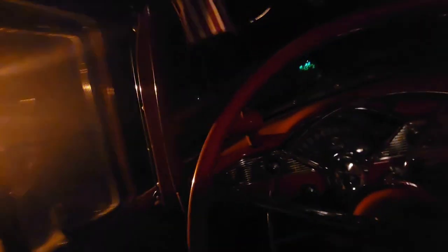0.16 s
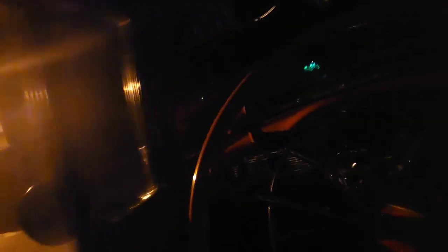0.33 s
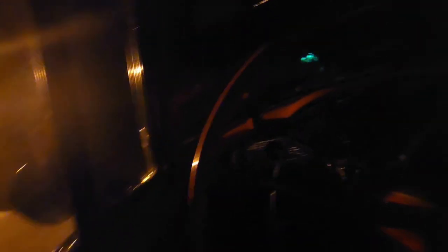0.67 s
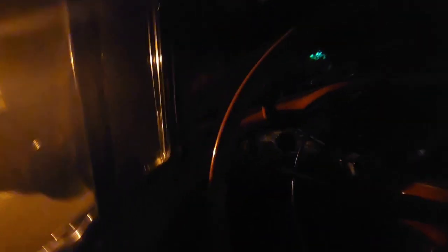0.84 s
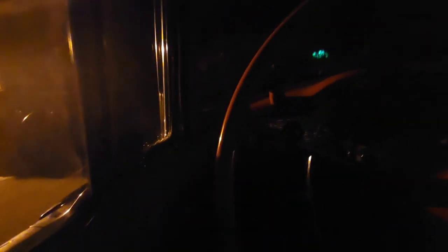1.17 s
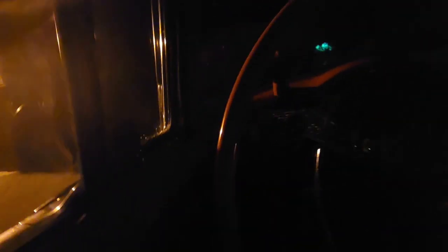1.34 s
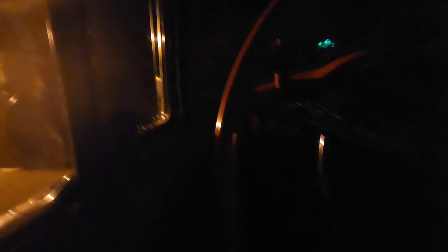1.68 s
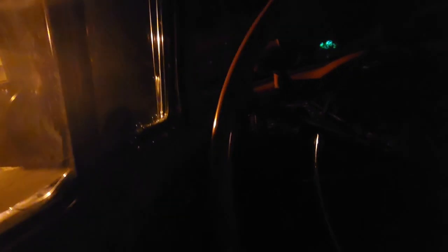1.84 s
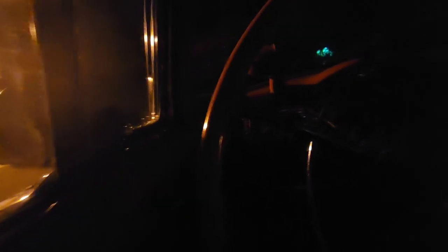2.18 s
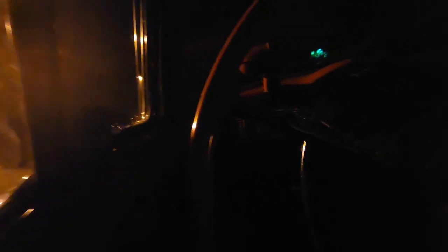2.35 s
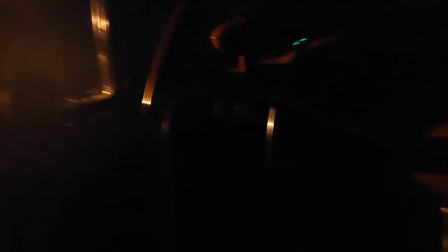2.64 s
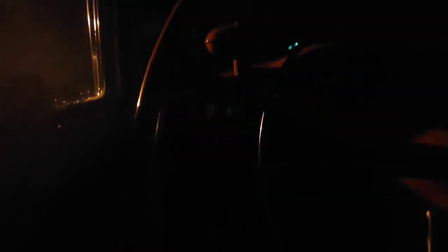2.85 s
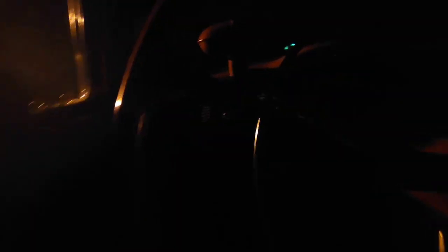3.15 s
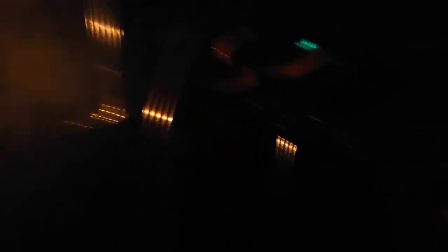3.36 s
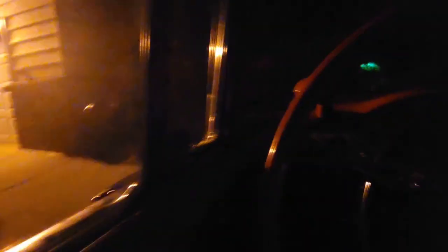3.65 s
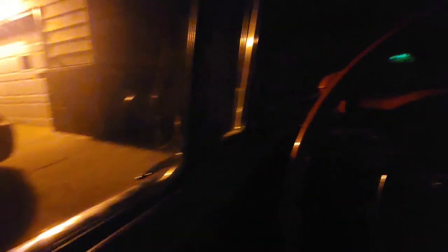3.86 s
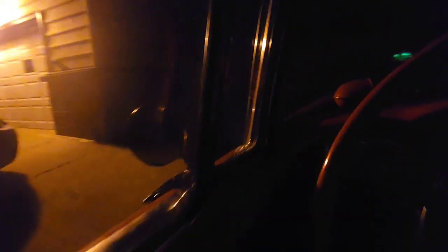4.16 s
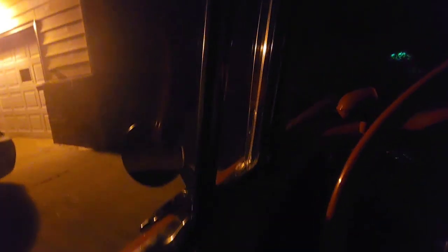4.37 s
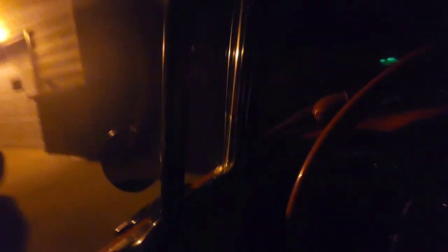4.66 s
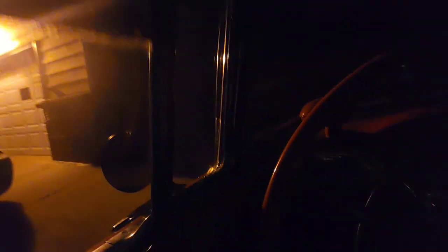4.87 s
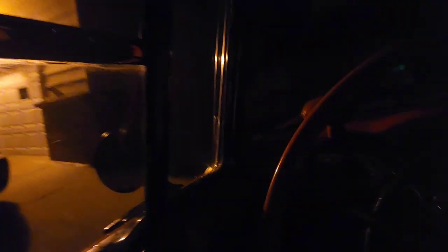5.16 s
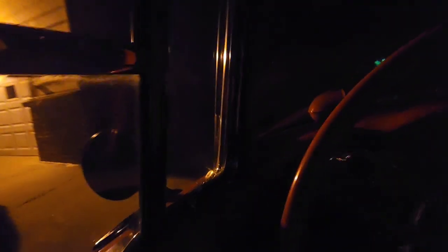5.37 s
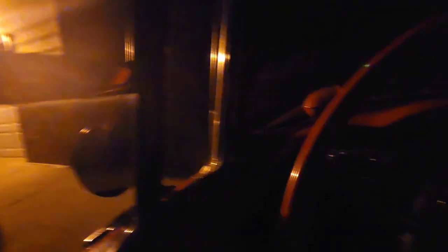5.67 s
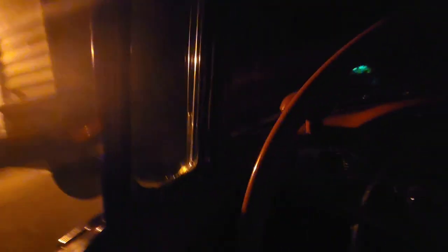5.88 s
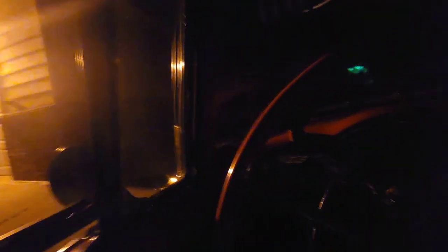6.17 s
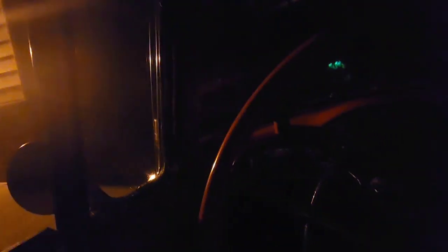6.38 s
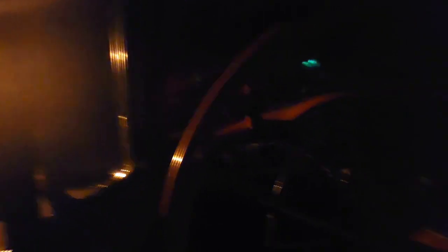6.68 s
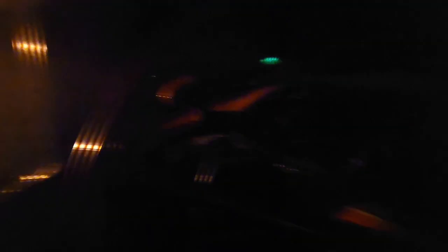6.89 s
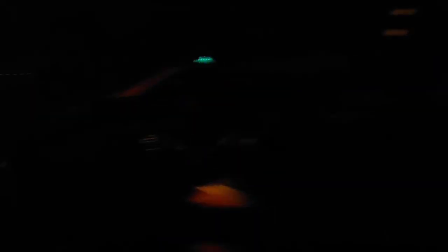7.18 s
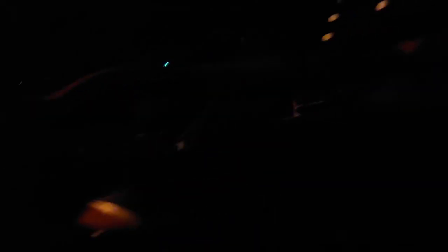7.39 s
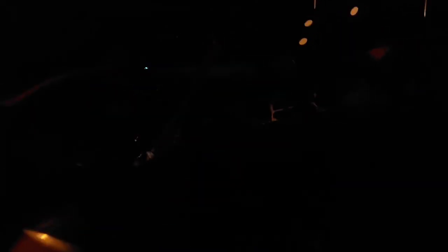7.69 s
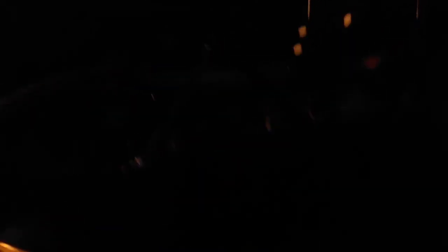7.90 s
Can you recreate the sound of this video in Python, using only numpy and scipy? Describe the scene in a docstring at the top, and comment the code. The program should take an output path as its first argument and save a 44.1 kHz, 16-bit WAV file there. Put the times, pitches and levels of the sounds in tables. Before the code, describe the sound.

Heard from the driver's seat of an old car, a heavy steel door on the left catches its latch and slams at about 0.4 seconds. It is by far the loudest sound, with a metallic clank, a quick rattle and a deep boom that dies away within a second or so. Faint clothing rustle and soft bumps follow as the driver settles, with a firmer thud at 3.3 seconds. At 3.7 a window crank gives a short creak, and the side window winds down until about 6.7, with a swishing sleeve, dull knocks and dragging glass that squeals most around 5.8. At 7.2 a deep handling bump jolts the microphone, with more rustling. Dry finger ticks come now and then, including one at 8 seconds. A faint low rumble and a barely audible thin whine fill the cabin throughout.

```python
"""Inside an old car at night a heavy steel door is pulled shut: the latch catches, then the door slams,
booms and rattles as it rocks on its seal. The driver settles with rustling clothes and bumps the trim.
Next the window crank creaks and the side window winds down: a sleeve swishes, the glass drags and sings
in its channel. Near the end the hand-held camera is jolted. Fingers tick on its case now and then,
and a faint rumble and a thin whine fill the cabin throughout."""
import sys
import numpy as np
from scipy.fft import rfft, irfft, next_fast_len
from scipy.io import wavfile
from scipy.ndimage import map_coordinates

SR = 44100
rng = np.random.default_rng(int(sys.argv[2]) if len(sys.argv) > 2 else 0)


def inscribe(sig):
    """Save sig as 16-bit PCM at rate SR to the path in sys.argv[1].

    A 1-D sig is mono; a 2-D sig holds one channel per row.
    Samples are clipped to [-1, 1] before scaling.
    """
    pcm = np.round(np.clip(np.atleast_2d(sig).T, -1, 1) * 32767)
    wavfile.write(sys.argv[1], SR, pcm.astype(np.int16))


N = 354563

# The bright hiss of a crash or scuff. Each row: frequency in Hz, relative level in dB.
CRASH_SPECTRUM = [(1500, -24.5), (2800, 1), (4500, 1.5), (7500, 1.5), (10000, -7), (12500, 0.5),
                  (15800, -3)]
# How alike left and right sound. Each row: frequency in Hz, likeness (1 means the same).
STEREO_LIKENESS = [(100, 1), (280, 0.97), (550, 0.66), (1100, 0.28), (2000, 0.096), (4000, 0),
                   (12000, 0.13)]
# How much louder the left side is. Each row: frequency in Hz, left minus right in dB.
LEFT_BIAS = [(60, 0.86), (150, 1), (350, 3), (700, 5), (1200, 2.5), (2200, -2), (4000, 3.5), (8000, 5),
             (13000, 7.5)]

REBOUND_S, SWING_S = 0.495, 0.052  # when the shut door starts to rock, and how long a swing takes


def door_clanks():
    """The latch rides over its striker, the door lands, then it rattles once a swing, ever more weakly."""
    # Steel hits steel. Each row: start in seconds, clank, crash and latch levels in dB, fade in seconds.
    contacts = [(.306, -46.5, -60.5, -75, 0.12), (0.349, -41.5, -49, -65, 0.098),
                (.379, -24, -40, -66, .17), (.408, -40, -41, -56, 0.055), (0.416, -32.5, -28.5, -52, 0.077),
                (.432, -10.5, -16, -35.5, 0.17), (.451, -18, -16, -18, 0.15), (.464, -18, -24, -27.5, .19)]
    # The tone of a clank. Each row: frequency in Hz, relative level in dB.
    clank_spectrum = [(100, -22.5), (300, -6.5), (550, 2.5), (900, 0.5), (1600, -3), (2150, -0.5),
                      (2600, -11.5), (3600, -21.5), (8000, -57.5)]
    # Notes of the door shell and small latch parts. Each row: pitch in Hz, level in dB, fade in seconds.
    shell_modes = [(466, -4, .3), (494, -5, .3), (599, -8, .27), (850, -5, .25), (924, -7, .22),
                   (1384, -9, .22), (1918, -8, .2), (2080, 2, .22), (2240, -3, .2), (2423, -3, .18),
                   (3310, -12, .2), (4291, -6, .18)]
    latch_modes = [(7510, -17, .13), (12435, -6, .08), (12700, -9, .09), (13438, -9, .07)]
    rattles = [(REBOUND_S + k * SWING_S, -24.5 - 6 * k, -31.5 - 5 * k, -30.5 - 2 * k, 0.12)
               for k in range(4)]
    out, size = np.zeros((2, N)), SR // 2
    for start, clank_db, crash_db, latch_db, t60 in contacts + rattles:
        clank = amp(clank_db - 1) * noise(clank_spectrum, grain_db=2, size=size) * pan(2.2)
        crash = amp(crash_db + 1) * noise(CRASH_SPECTRUM, grain_db=3, size=size) * pan(1)
        shell_db = 1.3 * clank_db - 8.5  # the shell rings mostly under hard blows
        shell = amp(shell_db) * ring(shell_modes, attack=0.001, scatter_db=-0.5, size=size) * pan(1)
        latch = amp(latch_db) * ring(latch_modes, attack=0.001, scatter_db=2, size=size)
        add(out, start, (clank + crash) * fall(t60, attack=0.0002, size=size) + shell + latch)
    return out


def door_boom():
    """The slam sets the door panel and the cabin air booming."""
    # Notes of the panel and the air. Each row: pitch in Hz, level in dB, fade in seconds.
    boom_modes = [(37.32, -32, 1.6), (52.1, -25, 1.2), (78.2, -24, 1.1), (99.03, -26, 0.81),
                  (123.7, -21, 1.4), (167.5, -16.5, .55), (224.4, -27, 0.47), (268.3, -21.5, .42),
                  (302, -26, 0.26)]
    # The deep noise of the slam. Each row: frequency in Hz, relative level in dB.
    body_spectrum = [(15, -9), (35, -6), (110, 1), (180, -5), (300, -11.5), (400, -18), (650, -29.5),
                     (1200, -48), (3000, -78)]
    out, size = np.zeros((2, N)), 2 * SR
    # the closing door squeezes the air just before the seal lands
    add(out, 0.38, amp(-22.5) * noise(body_spectrum, size=SR) * fall(0.89, attack=0.02))
    add(out, 0.434, amp(1) * ring(boom_modes, attack=0.012, scatter_db=1.5, size=size))
    # the soft seal passes on only the deepest notes when the door rebounds
    deep_modes = [(hz, db, t60) for hz, db, t60 in boom_modes if hz < 200]
    for k in range(2):
        sway = ring(deep_modes, attack=0.012, scatter_db=5, size=size)
        add(out, REBOUND_S + k * SWING_S, amp(-10 - 2 * k) * sway)
    # the whole car body goes on shuddering around the notes of the boom
    shudder = noise(body_spectrum, peaks=[(hz, 14, 7) for hz, _, _ in boom_modes], size=size)
    add(out, 0.432, amp(-10.5) * shudder * fall(0.8, attack=0.012, size=size))
    return out


def window():
    """A sleeve swishes as the crank turns; the glass drags, shakes the door and sings under pressure."""
    # The winding. Each row: time in seconds, glass drag level in dB, sleeve swish level in dB.
    winding = [(3.4, -80, -77.5), (3.62, -61, -60), (3.85, -66, -59), (4.28, -64, -53), (4.43, -59.5, -50),
               (4.68, -65, -56), (4.95, -47, -51.5), (5.2, -52, -56.5), (5.66, -44, -64), (6.0, -48, -54),
               (6.15, -54.5, -56.5), (6.28, -54.5, -58.5), (6.38, -62, -67), (6.7, -68.5, -77)]
    # The tones of door, glass and sleeve. Each row: frequency in Hz, relative level in dB.
    shudder_spectrum = [(30, -18), (60, -15.5), (100, 6), (170, 4), (230, -7), (320, -11), (450, -23),
                        (900, -56)]
    drag_spectrum = [(200, -59), (350, 3.5), (700, -2), (900, -8.5), (1400, -6.5), (2000, -7.5),
                     (3200, -7.5), (5000, -16.5), (8000, -21.5), (12000, -23.5)]
    swish_spectrum = [(500, -21), (1000, 5), (2200, 5), (4200, 5.5), (6000, 2.5), (7600, 1), (9500, -4),
                      (12500, 5), (15800, 2)]
    # Narrow resonances of glass and sleeve. Each row: pitch in Hz, width in Hz, boost in dB.
    glass_peaks = [(599, 82, 14.5), (762, 93, 9), (1106, 40, 12), (1395, 22, 11.5), (2290, 65, 11.5),
                   (2580, 41, 13), (3450, 66, 10.5), (4130, 43, 1), (5280, 33, 12), (6320, 66, -7),
                   (7310, 130, 11.5)]
    swish_peaks = [(1866, 46, 7.5), (2180, 130, 10), (2350, 62, 6), (3290, 51, 12), (4190, 81, 8),
                   (5330, 60, 10), (6360, 190, 7), (7520, 125, 12)]
    push_s, push_width_s = 5.84, 0.048  # one hard push on the crank
    usual_drag_db, usual_swish_db = -53.5, -59.5
    push_db = 11 * np.exp(-((np.arange(N) / SR - push_s) / push_width_s) ** 2)
    drag_db, swish_db = curves(winding) + push_db
    grip_db = 1.26 * wobble(rate=24)  # the glass catches and lets go
    effort_db = 0.35 * (drag_db - usual_drag_db) + 0.53 * (swish_db - usual_swish_db)
    shudder = amp(-42.5 + effort_db + grip_db) * noise(shudder_spectrum)
    pressure = np.clip((drag_db + 60) / 12, 0, 1)
    plain = np.sqrt(1 - pressure) * noise(drag_spectrum, grain_db=1, grain_rate=200)
    singing = np.sqrt(pressure) * noise(drag_spectrum, grain_db=2, grain_rate=460, peaks=glass_peaks)
    drag = amp(drag_db + 3 + grip_db) * (plain + singing)
    sleeve = noise(swish_spectrum, grain_db=0.4, peaks=swish_peaks) * pan(-0.5)
    swish = amp(swish_db + 3.5 + 2.1 * grip_db) * sleeve
    return (shudder + drag + swish + np.sqrt(pressure) * glass_squeal(drag_db)) * during(winding)


def glass_squeal(drag_db):
    """One resonance of the glass sings out unsteadily, the louder the harder it drags."""
    band = noise([(1900, -41), (2150, -25), (2240, 14), (2330, -24), (2700, -40)])
    flutter_db = 4 * wobble(rate=51)
    return amp(drag_db - 6.5 + flutter_db) * band


def crank_creak():
    """The dry spindle chirps as the crank is taken in hand."""
    # Notes of the spindle. Each row: pitch in Hz, level in dB, fade in seconds.
    spindle_modes = [(1040, 0, 0.076), (1300, 0.5, 0.086)]
    out = np.zeros((2, N))
    add(out, 3.666, amp(-30) * ring(spindle_modes, attack=0.003, scatter_db=1))
    return out


def knocks():
    """Padded blows on seat and trim: the cabin air thuds under a scuff and a dull clack."""
    # Each row: start in seconds, thud level in dB and pitch in Hz, clack level in dB and pitch in Hz,
    # fade of the clack in seconds.
    bumps = [(.204, -36, 123, -42.5, 476, .14), (1.272, -44, 122, -57.5, 511, 0.13),
             (2.721, -40.5, 110, -55.5, 321, .25), (2.799, -35.5, 95, -79, 259, .1),
             (2.908, -35.5, 134.6, -45, 440, 0.18), (3.311, -30, 129, -36.5, 444, 0.19),
             (3.325, -19, 117, -31, 330, 0.07), (3.379, -35, 105, -44.5, 327, 0.13),
             (3.521, -39.5, 130, -47.5, 510, 0.42), (3.635, -28.5, 78, -41, 1830, 0.29),
             (3.663, -24.5, 179, -27.5, 1250, 0.059), (4.392, -33.5, 140, -48, 412, .18),
             (4.774, -25.5, 201, -50, 326, .2), (4.923, -28.5, 190, -43, 302, 0.6),
             (5.108, -36, 152, -44, 2060, 0.27), (5.154, -45, 150, -42, 1990, 0.64),
             (5.822, -24.5, 160, -28, 2200, 0.07), (5.904, -28.5, 128, -39.5, 346, 0.4),
             (6.192, -32.5, 158, -41.5, 1260, 0.2), (6.407, -30, 100, -49, 324, 0.37),
             (6.51, -29, 109, -35, 600, 0.14), (7.207, -52, 110, -51.5, 400, 0.19),
             (7.245, -40.5, 170, -51, 426, 0.27), (7.851, -64, 100, -48.5, 411, .1),
             (7.939, -52, 79, -48.5, 1920, 0.063), (8.008, -53, 110, -37.5, 2010, 0.069)]
    # Notes of the cabin air. Each row: pitch in Hz, level in dB, fade in seconds.
    cabin_modes = [(75, -2.5, 0.4), (104.6, -0.5, 0.25), (130, -1.5, 0.16), (183.2, -2, .16),
                   (275.3, -10.5, 0.29), (310, -10, 0.18)]
    # The tone of a clack. Each row: frequency in Hz, relative level in dB.
    clack_spectrum = [(120, -22), (300, 6.5), (480, -1), (750, 1), (1250, -3), (1700, -7), (2400, -7.5),
                      (3300, -26.5), (8000, -59)]
    out, size = np.zeros((2, N)), SR // 2
    for start, thud_db, thud_hz, clack_db, clack_hz, t60 in bumps + settling_bumps():
        clack = noise(clack_spectrum, grain_db=-1, peaks=[(clack_hz, clack_hz * 0.13, 13)], size=size)
        scuff = amp(-19.5) * noise(CRASH_SPECTRUM, grain_db=2, size=size)
        add(out, start, amp(clack_db) * (clack + scuff) * fall(t60, attack=0.000082, size=size))
        # a blow mostly wakes the notes near its own pitch
        woken = [(hz, db - 11 * abs(np.log2(hz / thud_hz)), fade) for hz, db, fade in cabin_modes]
        add(out, start, amp(thud_db + 3) * ring(woken, attack=0.0098, scatter_db=5, size=size))
    return out


def settling_bumps(count=6, first_s=1.05, gap_s=0.3, thud_hz=154.6, clack_hz=340, t60=0.16):
    """The driver settles in the seat: rows for knocks(), loosely spaced and ever fainter."""
    k = np.arange(count)
    starts = first_s + k * gap_s + 0.082 * rng.standard_normal(count)
    levels_db = -42 - 4.2 * k
    return [(start, db, thud_hz, db - 17, clack_hz, t60) for start, db in zip(starts, levels_db)]


def handling():
    """A shifting grip jolts the camera with deep bumps; fingers make dry ticks on its case."""
    # Each row: start in seconds, level in dB, fade in seconds.
    jolts = [(7.205, -33.5, 0.69), (7.245, -22.5, 0.51), (7.279, -34.5, 2)]
    # The tone of a jolt. Each row: frequency in Hz, relative level in dB.
    jolt_spectrum = [(15, -23), (32, 12.5), (85, -2.5), (150, -3.5), (250, -23), (450, -31), (1200, -61.5)]
    # Each row: start in seconds, snap level in dB, case ring level in dB.
    ticks = [(1.0194, -29.5, -50.5), (1.029, -40.5, -55), (3.568, -35.5, -49.5), (3.78, -18.5, -34),
             (5.11, -28, -34), (6.589, -39.5, -56.5), (7.131, -28.5, -48), (7.38, -38, -55),
             (7.703, -57, -58), (7.939, -41, -55), (7.9752, -37.5, -52), (8.0017, -20, -22)]
    # Notes of the case. Each row: pitch in Hz, level in dB, fade in seconds.
    case_modes = [(1240, -6, 0.0081), (1630, 12.5, 0.0022), (2254, 1, 0.0032), (3760, -18, 0.0072),
                  (8060, -4, 0.013)]
    snap_spectrum = [(1500, -8.5), (4000, 3), (9000, -5.5), (13000, 3), (15800, -5.5)]
    out, size = np.zeros((2, N)), SR // 8
    for start, db, t60 in jolts:
        add(out, start, amp(db) * noise(jolt_spectrum, size=SR) * fall(t60, attack=0.0052))
    for start, snap_db, case_db in ticks:
        snap = noise(snap_spectrum, size=size) * fall(0.0078, attack=0.0011, size=size)
        case = ring(case_modes, attack=0.000093, scatter_db=7, size=size) * pan(3.5)
        add(out, start, amp(snap_db + 2) * snap + amp(case_db) * case)
    return out


def clothes(rise_db_per_s=108.5, fall_db_per_s=105):
    """Every small move swells, holds and fades as a soft rustle; quicker ones add a crisp edge."""
    # Each row: start and end in seconds, soft and crisp rustle levels in dB.
    moves = [(-.1, 0.223, -59, -77), (0.724, 0.879, -66, -79.5), (1.049, 1.349, -75.5, -85.5),
             (1.681, 2.05, -81.5, -83.5), (2.142, 2.36, -68.5, -81), (2.608, 2.803, -75, -80),
             (3.028, 3.126, -73, -80), (3.178, 3.448, -63, -78), (6.62, 7.353, -66.5, -74.5),
             (6.968, 7.081, -62.5, -64.5), (7.5, 7.901, -76, -88.5), (7.97, 8.038, -64.5, -71.5)]
    # The two tones of the cloth. Each row: frequency in Hz, relative level in dB.
    soft_spectrum = [(120, 1.5), (300, 9), (500, 6), (800, 1), (1100, 2.5), (2300, -3.5), (3200, -13.5),
                     (6000, -31.5)]
    crisp_spectrum = [(1200, -20.5), (3000, 0.5), (4200, 0), (6300, -0.5), (7500, 3.5), (8600, -4),
                      (10200, -9.5), (12500, -6), (15800, -6.5)]
    t, soft_gain, crisp_gain = np.arange(N) / SR, np.zeros(N), np.zeros(N)
    for start, end, soft_db, crisp_db in moves:
        fade_db = rise_db_per_s * np.maximum(start - t, 0) + fall_db_per_s * np.maximum(t - end, 0)
        soft_gain = np.maximum(soft_gain, amp(soft_db + 3 - fade_db))
        crisp_gain = np.maximum(crisp_gain, amp(crisp_db + 7.5 - fade_db))
    soft = soft_gain * noise(soft_spectrum, grain_db=0.5, grain_rate=630)
    return soft + crisp_gain * noise(crisp_spectrum, grain_db=1)


def cabin_rumble():
    """A low rumble with a faint hum, and a thin wavering whine."""
    # How each swells and sinks. Each row: time in seconds, level in dB.
    rumble_levels = [(0, -42.5), (1.1, -44.5), (1.8, -53.5), (2.6, -54.5), (3.5, -42.5), (4.4, -51.5),
                     (6.3, -36.5), (6.8, -51.5), (8.04, -54)]
    whine_levels = [(0, -12.5), (3.2, -10), (3.9, 8.5), (6.6, 17), (7.3, 6.5), (8.04, -1)]
    # The tone of the rumble and the notes of the whine. Each row: frequency in Hz, relative level in dB.
    rumble_spectrum = [(15, -3.5), (35, -0.5), (70, 2), (120, 0.5), (180, -10), (260, -20), (380, -19),
                       (500, -43), (1500, -43.5), (8000, -68)]
    whine_tones = [(1760, -79), (2342, -92)]
    rumble = amp(curves(rumble_levels)[0] - 2) * noise(rumble_spectrum, peaks=[(373.5, 14, 4.6)])
    whine = np.zeros(N)
    for hz, db in whine_tones:
        gain = amp(db + 2 + 3 * wobble(rate=10))
        pitch_hz = hz + 6 * wobble(rate=40)
        whine += gain * np.sin(2 * np.pi * np.cumsum(pitch_hz) / SR)
    return rumble + amp(curves(whine_levels)[0]) * whine


def noise(spectrum, grain_db=0, grain_rate=900, peaks=(), size=N):
    """Grainy stereo noise with the given tone; the average of its two sides has a strength (rms) of 1."""
    fft_size = next_fast_len(size)
    hz = np.fft.rfftfreq(fft_size, 1 / SR)
    white = rng.standard_normal((2, size)) * amp(grain_db * wobble(grain_rate, size))
    peaks_db = sum(db / (1 + ((hz - centre) / width * 2) ** 2) for centre, width, db in peaks)
    coloured = rfft(white, fft_size) * amp(along(spectrum, hz) + peaks_db)
    spread = np.arccos(along(STEREO_LIKENESS, hz)) / 2
    mid, side = coloured * [np.cos(spread), np.sin(spread)]
    sides = np.array([mid + side, mid - side]) * pan(-along(LEFT_BIAS, hz) / 2)
    pair = irfft(sides, fft_size)[:, :size]
    return pair / pair.mean(0).std()


def ring(modes, attack, scatter_db, size=SR):
    """The fading notes (modes) of a struck object; the higher ones reach left and right out of step."""
    t, out = np.arange(size) / SR, np.zeros((2, size))
    for k, (hz, db, t60) in enumerate(modes):
        phase = np.arccos(along(STEREO_LIKENESS, hz)) * rng.choice([-0.5, 0.5]) * np.array([[1], [-1]])
        gain = amp(db + scatter_db * rng.standard_normal()) * pan(-along(LEFT_BIAS, hz) / 2)
        out += (-1) ** k * gain * np.sin(2 * np.pi * hz * t + phase) * fall(t60, attack, size)
    return out


def fall(t60, attack, size=SR):
    """The loudness of a blow: a quick rise, then a fade of 60 dB every t60 seconds."""
    t = np.arange(size) / SR
    return amp(-60 * t / t60) * (1 - np.exp(-t / attack))


def amp(db):
    """Turn decibels into a gain."""
    return 10 ** (np.asarray(db) / 20)


def pan(right_db):
    """Gains that raise the right side and lower the left by the same number of dB."""
    return amp(right_db * np.array([[-1], [1]]))


def along(points, hz):
    """Read between rows of frequency and value, on a logarithmic frequency scale."""
    frequencies, values = np.transpose(points)
    return np.interp(np.log(hz + 1), np.log(frequencies + 1), values)


def curves(rows):
    """One value per sample for each column after the time."""
    times, *columns = np.transpose(rows)
    return [np.interp(np.arange(N) / SR, times, column) for column in columns]


def during(rows, fade_s=0.12):
    """A gain of 1 from the first row's time to the last, fading to 0 outside."""
    t = np.arange(N) / SR
    return np.clip(1 + np.minimum(t - rows[0][0], rows[-1][0] - t) / fade_s, 0, 1)


def wobble(rate, size=N):
    """A smooth curve through `rate` random values a second."""
    return map_coordinates(rng.standard_normal(size // 8), [np.arange(size) * rate / SR], mode="wrap")


def add(track, start_s, sound):
    """Mix a sound into a track at the given time."""
    part = track[..., round(start_s * SR):][..., :sound.shape[-1]]
    part += sound[..., :part.shape[-1]]


def scene():
    """Everything heard from the driver's seat, with the door on the left."""
    door = door_clanks() + door_boom()
    left, right = door + knocks() + crank_creak() + window() + clothes() + cabin_rumble()
    delay_s = 0.00035  # sound from the door side reaches the left microphone first
    late_right = np.pad(right, (round(delay_s * SR), 0))[:N]
    return np.array([left, late_right]) + handling()


def record(dry):
    """Clip the peaks at full scale and cut off the highest treble."""
    top_hz = 15900
    fft_size = next_fast_len(N + SR // 2)
    hz = np.fft.rfftfreq(fft_size, 1 / SR)
    spectrum = rfft(np.clip(dry, -1, 1), fft_size)
    return irfft(spectrum / (1 + (hz / top_hz) ** 160), fft_size)[:, :N]


dry = scene()
out = record(dry)
inscribe(out)
```